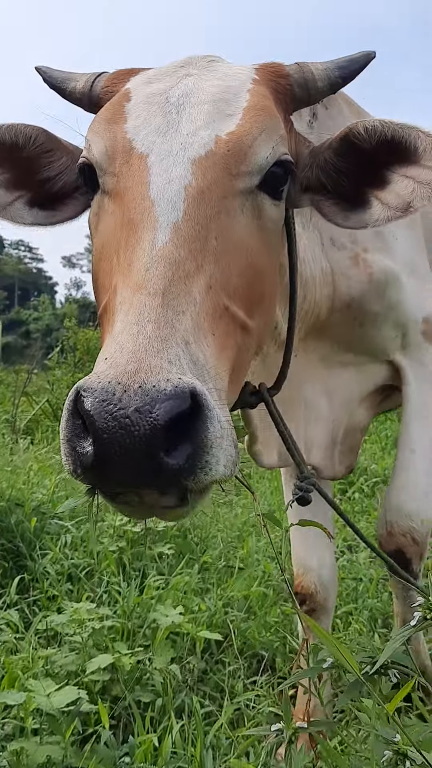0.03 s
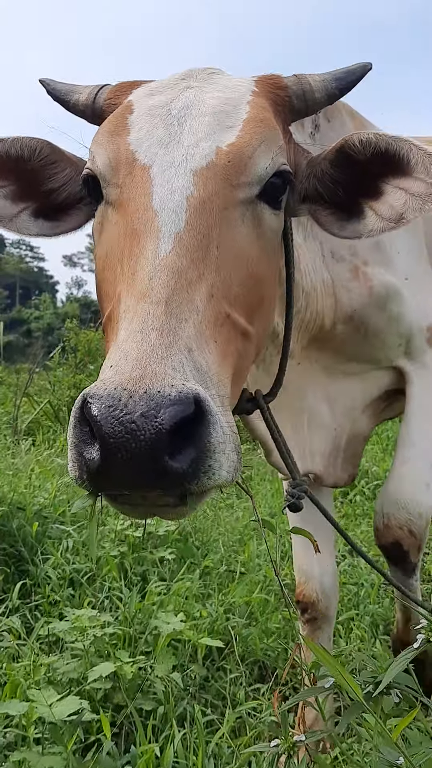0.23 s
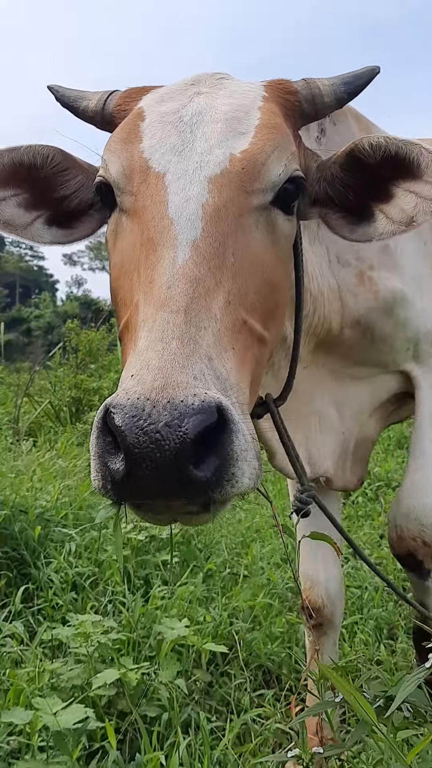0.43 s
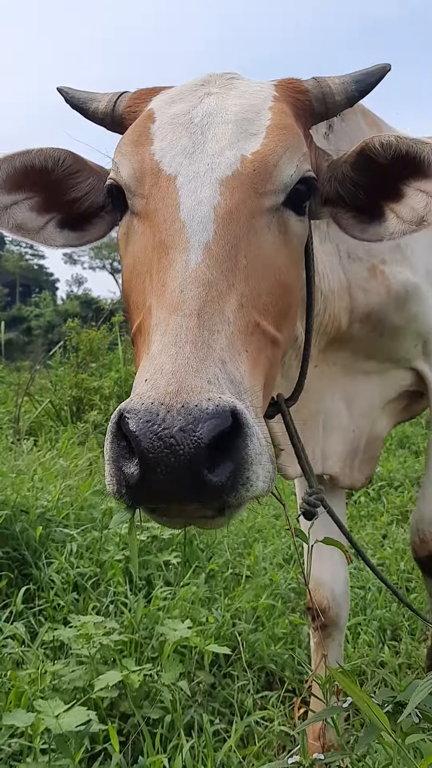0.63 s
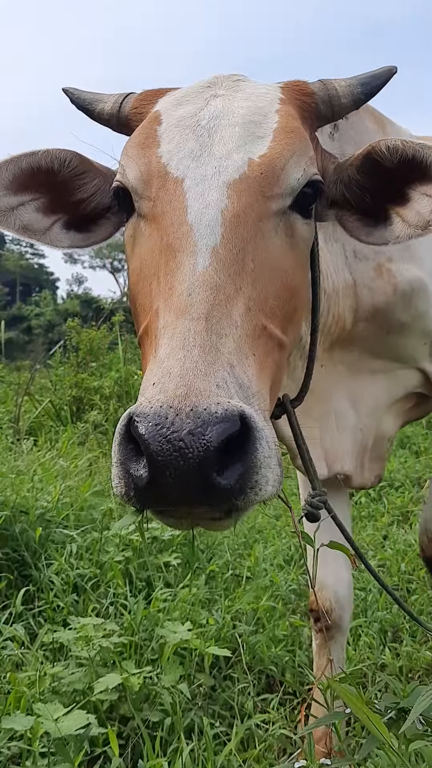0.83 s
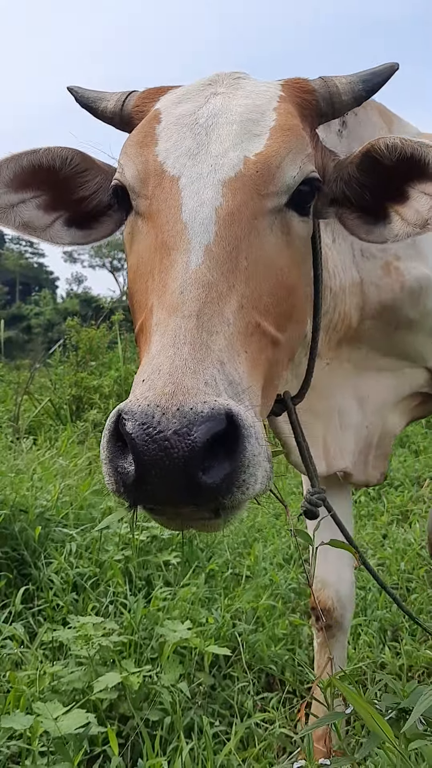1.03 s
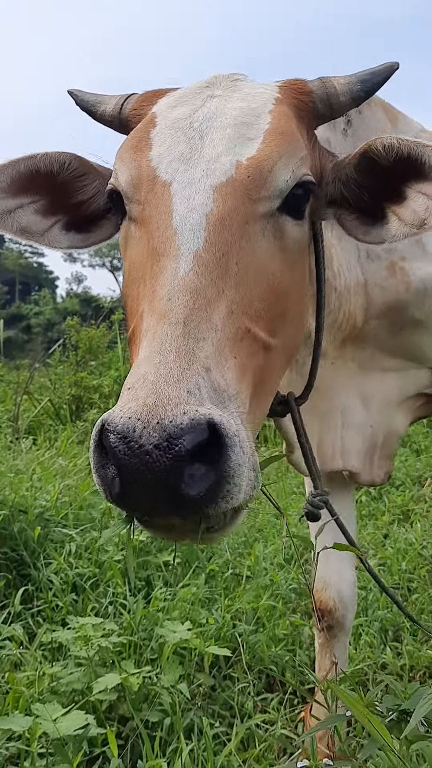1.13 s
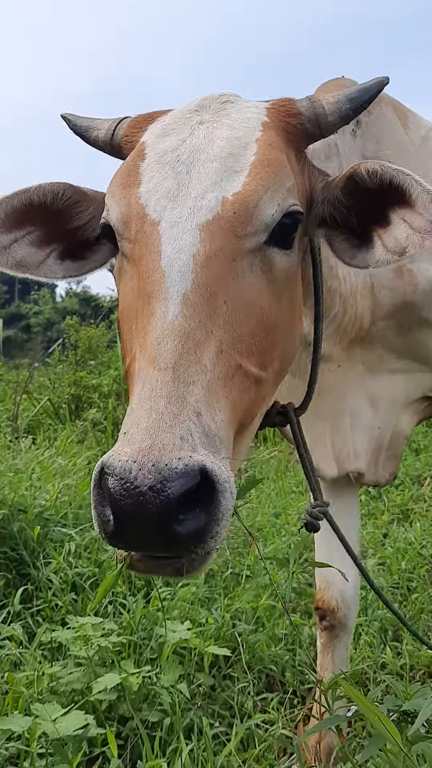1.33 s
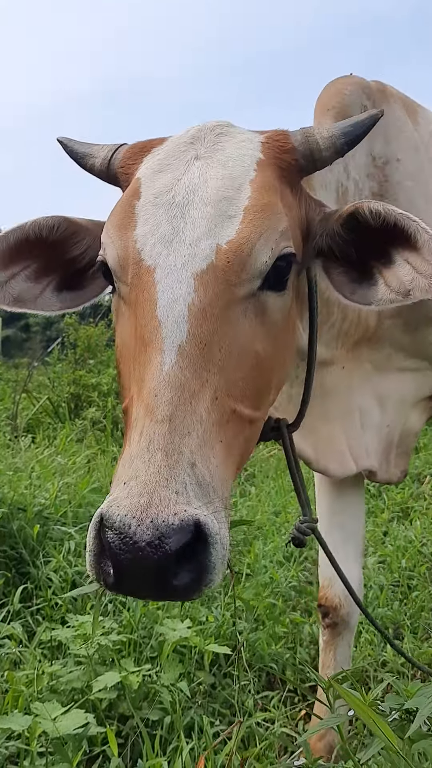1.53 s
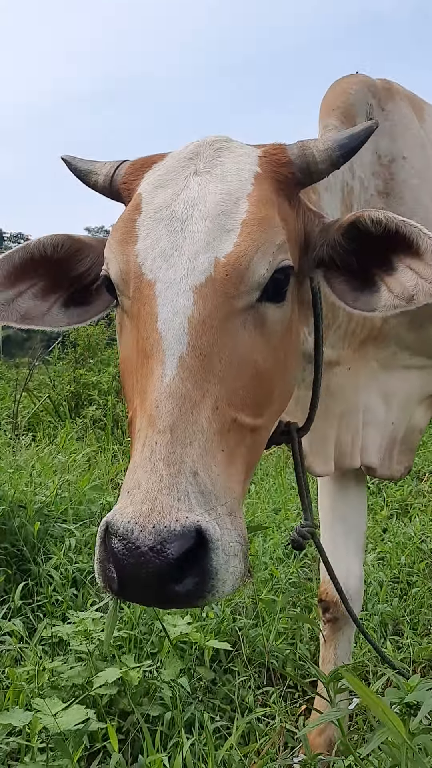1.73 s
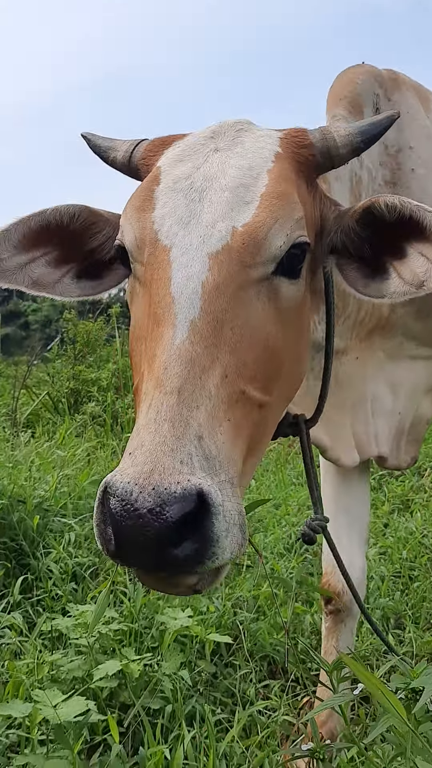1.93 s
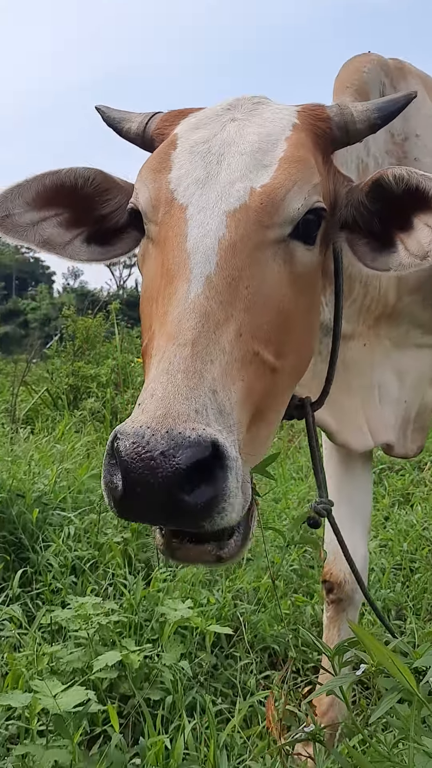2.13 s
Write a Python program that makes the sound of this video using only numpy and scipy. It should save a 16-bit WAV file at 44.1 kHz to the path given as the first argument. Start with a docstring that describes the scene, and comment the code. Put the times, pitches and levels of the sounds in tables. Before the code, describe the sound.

A cow munches grass with heavy muffled thuds, while insects shimmer and a bird whistles faintly

```python
"""A cow chews grass in a meadow: dull thumps, about one strong one per chew, are pressure pulses ringing damped
resonances, with scuffs, a sinking boom and a low rumble around them. Her munching is swelling resonant noise.
Grass is shaped noise, insects a narrow noise band, the bird a frequency-modulated sine; a steady shaped noise,
air with a weak insect band, lies behind. The left microphone is open to the meadow and gets only a trace of
the thumps; the muffled right one takes them in full. The hardest thump makes the limiter duck both channels."""
import sys
import numpy as np
from scipy.fft import rfft, irfft, next_fast_len
from scipy.io import wavfile
from scipy.ndimage import uniform_filter1d, minimum_filter1d, map_coordinates

SR = 44100
rng = np.random.default_rng(int(sys.argv[2]) if len(sys.argv) > 2 else 0)


def put_to_file(sound):
    """Save the sound as 16-bit audio at rate SR, in the file named by the first command-line argument."""
    columns = np.atleast_2d(sound).T  # one column per channel
    safe = np.clip(columns, -1, 1)
    whole_steps = np.round(safe * 32767)
    wavfile.write(sys.argv[1], SR, whole_steps.astype(np.int16))


N = 95652  # samples


def amp(db):
    """Logarithmic level: decibels to amplitude gain."""
    return 10 ** (np.asarray(db) / 20)


def unit(x):
    """Normalisation: scale to rms 1."""
    return x / np.sqrt(np.mean(x ** 2) + 1e-20)


def clock():
    """Sampling: time in seconds at each sample."""
    return np.arange(N) / SR


def curves(rows):
    """Linear interpolation: one value per sample for each column after the time."""
    times, *columns = np.transpose(rows)
    return [np.interp(clock(), times, column) for column in columns]


def wobble(rate):
    """Random modulation: a smooth curve through normal random knots, rate of them per second."""
    return map_coordinates(rng.standard_normal(4096), [clock() * rate], mode="wrap")


def filtered(x, response):
    """Linear filtering: multiply the spectrum by a response of frequency."""
    m = next_fast_len(N + SR // 2)  # padding leaves room for the ringing
    f = np.fft.rfftfreq(m, 1 / SR)
    return irfft(rfft(x, m) * response(f), m)[..., :N]


def resonance(f, hz, width):
    """Damped resonance: the response of one second-order resonator, of gain 1 at its peak."""
    return 1j * f * width / (hz * hz - f * f + 1j * f * width)


def noise(colour):
    """Spectral shaping: white noise given a relative f/Hz, level/dB curve, at rms 1."""
    hz, db = np.transpose(colour)

    def response(f):
        return amp(np.interp(np.log(f + 1), np.log(hz), db))

    return unit(filtered(rng.standard_normal(N), response))


def band(hz, width):
    """Cascaded resonance: noise through two equal resonators, at rms 1."""
    return unit(filtered(rng.standard_normal(N), lambda f: resonance(f, hz, width) ** 2))


def tone(hz):
    """Phase integration: a sine whose phase is the running sum of its frequency."""
    return np.sin(2 * np.pi * np.cumsum(hz) / SR)


# Relative spectral density of the steady background, air noise with a weak insect band near 4.8 kHz:
# f/Hz, level/dB per Hz
BACKGROUND_SPECTRUM = [(25, -11.5), (90, 11), (220, -0.5), (430, 6), (750, -4), (1800, -5), (3200, -22),
                       (4100, -2), (4750, 12), (5600, 0), (6500, -7), (7400, -6), (10000, -5.5),
                       (12500, 1.5), (14000, -22), (16000, -12)]
BACKGROUND_DB = -63.5


def background():
    """Stationary noise: a steady meadow background of air noise with a weak insect band near 4.8 kHz."""
    return amp(BACKGROUND_DB) * noise(BACKGROUND_SPECTRUM)


# Mean level of the insect band: t/s, level/dB
INSECT_LEVEL = [(0, -46.5), (.33, -45.5), (.75, -45.5), (1.15, -50.5), (1.4, -49.5), (1.62, -50),
                (1.9, -46), (2.17, -50.5)]
INSECT_HZ, INSECT_WIDTH_HZ = 8634, 730  # centre, half-power bandwidth


def insects():
    """Superposition: many insects merge into one narrow, shimmering noise band with steep sides."""
    level_db, = curves(INSECT_LEVEL)

    def response(f):
        return (1 + (2 * (f - INSECT_HZ) / INSECT_WIDTH_HZ) ** 4) ** -.5

    shrill = unit(filtered(rng.standard_normal(N), response))
    return amp(level_db + 1.3 * wobble(45.1)) * shrill


# Mean pitch and level of the long whistle, before buzz and dips: t/s, f/Hz, level/dB
WHISTLE_PATH = [(.54, 6550, -100), (.59, 6404, -67), (.63, 6290, -62.5), (.68, 6620, -63), (.72, 5820, -67),
                (.77, 5340, -58.5), (.815, 5300, -58), (.86, 5035, -61.5), (.97, 4904, -55),
                (1.01, 5000, -58), (1.06, 4884, -52.5), (1.125, 5020, -56), (1.176, 4870, -53),
                (1.245, 4910, -51.5), (1.29, 5130, -62.5), (1.4, 4905, -53), (1.435, 4893, -62),
                (1.52, 5040, -61.5), (1.58, 4910, -59.5), (1.62, 4930, -78)]
# Buzz on the whistle: t/s, amplitude depth (0-1), pitch swing/Hz
BUZZ_PATH = [(.78, .05, 5), (.92, 0.66, 11), (1.24, 0.52, 10), (1.3, 1, 280), (1.39, 0.86, 21),
             (1.55, 1, 93)]
BUZZ_HZ = 406  # mean rate
# Centres of the brief dips in the whistle: t/s
DIP_TIMES = [.868, .99, 1.028, 1.118, 1.326, 1.376, 1.56]
DIP_DB, DIP_S = -6.5, .007  # depth, Gaussian half length


def whistle():
    """Amplitude and frequency modulation: one buzz modulates both the level and pitch of a sliding sine."""
    hz, db = curves(WHISTLE_PATH)
    db = db + DIP_DB * sum(np.exp(-((clock() - s) / DIP_S) ** 2) for s in DIP_TIMES)
    depth, swing_hz = curves(BUZZ_PATH)
    buzz = tone(BUZZ_HZ * (1 + .03 * wobble(40)))
    level = amp(db + 1.6 * wobble(120)) * (1 + depth * buzz)
    return level * tone(hz * (1 + 0.00397 * wobble(250)) + swing_hz * buzz)


# Short slurs: start t/s, length/s, start f/Hz, end f/Hz, mean peak level/dB
SLUR_PATHS = [(0.664, 0.093, 6750, 7470, -59), (1.7, 0.047, 5950, 4550, -62.5),
              (1.794, 0.0295, 5290, 4600, -64), (1.82, .07, 5760, 4400, -63.5)]


def slurs():
    """Frequency glide: short sines sweep linearly in pitch under half-sine envelopes."""
    song = np.zeros(N)
    for s, length, start_hz, end_hz, level_db in SLUR_PATHS:
        u = np.clip((clock() - s) / length, 0, 1)  # progress through the slur
        hz = (start_hz + (end_hz - start_hz) * u) * (1 + 0.013 * wobble(600))
        song += amp(level_db + 2.2 * wobble(150)) * np.sin(np.pi * u) * tone(hz)
    return song


def bird():
    """Superposition of modulated sines: a long whistle and short slurs."""
    return np.sqrt(2) * (whistle() + slurs())  # a unit sine is brought to rms 1


# Mean level of the rustle: t/s, level/dB
RUSTLE_LEVEL = [(0, -59), (.06, -52), (.19, -62.5), (.31, -57), (.52, -59), (.66, -69.5), (.92, -80),
                (1.07, -60.5), (1.45, -67), (1.61, -64.5), (1.76, -77.5), (2, -73), (2.1, -65)]
# Relative spectral density of the rustle: f/Hz, level/dB per Hz
RUSTLE_SPECTRUM = [(100, -9), (800, -6.5), (1350, 0.5), (1900, -3), (2700, -3.5), (4000, -7.5),
                   (7000, -6.5), (16000, -26)]
# Level of the high hiss: t/s, level/dB
HISS_LEVEL = [(0, -47.5), (.06, -46), (.2, -53.5), (.43, -63), (.54, -50), (.66, -69.5), (.95, -69),
              (1.95, -70.5), (2.12, -62.5)]
# Relative spectral density of the hiss: f/Hz, level/dB per Hz
HISS_SPECTRUM = [(100, -18), (2500, -9), (6000, -5), (11000, 3.5), (16000, -1.5)]


def grass():
    """Friction noise: blades brush together as level-modulated noise, with a fine hiss on top."""
    rustle_db, = curves(RUSTLE_LEVEL)
    hiss_db, = curves(HISS_LEVEL)
    rustle = amp(rustle_db + wobble(70.27)) * noise(RUSTLE_SPECTRUM)
    hiss = amp(hiss_db) * noise(HISS_SPECTRUM)
    return rustle + hiss


# Mean level of the rumble: t/s, level/dB
RUMBLE_PATH = [(0, -39), (.33, -34.5), (.45, -36.5), (.7, -37.5), (.97, -40.5), (1.25, -37.5),
               (1.62, -41.5), (1.85, -38), (2.17, -38)]
# Relative spectral density of the rumble: f/Hz, level/dB per Hz
RUMBLE_SPECTRUM = [(20, -13.5), (60, 1), (115, 0.5), (180, -14), (400, -28.5), (600, -45.5), (900, -54),
                   (2500, -58.5), (9000, -72), (13300, -56), (16000, -66)]
RUMBLE_SWING_DB = 1  # standard deviation of the knots


def rumble():
    """Random level modulation: low-frequency noise swells restlessly under the thumps."""
    level_db, = curves(RUMBLE_PATH)
    return amp(level_db + RUMBLE_SWING_DB * wobble(23)) * noise(RUMBLE_SPECTRUM)


# Uneven swells: peak t/s, level/dB before the wobble, rise/s, fall/s, mouth resonance f/Hz, resonator width/Hz
MUNCH_SWELLS = [(.06, -62, 0.055, 0.084, 500, 260), (.31, -62.5, 0.11, 0.17, 512, 282),
                (1.01, -59, 0.076, 0.051, 518, 161), (1.16, -50.5, 0.12, 0.11, 436, 212),
                (1.41, -61, 0.12, 0.047, 404, 201), (1.63, -55, 0.083, 0.053, 486, 217),
                (1.549, -61, 0.05, 0.028, 1340, 600), (1.62, -54.5, 0.052, 0.061, 1118, 594)]


def munching():
    """Resonant filtering: swells of soft noise are coloured by the cow's mouth."""
    t, out = clock(), np.zeros(N)
    for s, db, rise, fall, hz, width in MUNCH_SWELLS:
        swell = np.exp(-((t - s) / np.where(t < s, rise, fall)) ** 2)
        out += amp(db) * swell * band(hz, width)
    return out * amp(1.66 * wobble(50.1))


# Damped modes that a push rings: f/Hz, width/Hz, level/dB before the low cut
BODY_MODES = [(103.3, 79.6, 4), (214, 130, -4.5), (428, 480, -0.5), (119.2, 19.7, -0.5)]
BODY_LOW_HZ = 42  # first-order high-pass corner


def body(f):
    """Modal summation: the damped low resonances that every push rings, above a low cut."""
    modes = sum(amp(db) * resonance(f, hz, width) for hz, width, db in BODY_MODES)
    return modes * 1j * f / (BODY_LOW_HZ + 1j * f)


# Runs of tiny pushes: centre t/s, level/dB, Gaussian half length/s
SCUFF_RUNS = [(0.076, -37.5, .02), (0.246, -34, 0.035), (0.327, -42.5, 0.022), (0.532, -44.5, 0.025),
              (0.815, -36, 0.016), (1.081, -44, 0.039), (1.208, -35, 0.018), (1.429, -45, 0.017),
              (1.738, -45, 0.013), (1.835, -38.5, 0.043), (2.023, -41.5, 0.019)]
SCUFF_RATE, SCUFF_SOFT_HZ = 500, 432  # mean pushes per second, scale of the treble roll-off


def scuffs():
    """Random impulse train: tiny, soft, irregular pushes crowd around the thumps and ring the body."""
    level = sum(amp(db) * np.exp(-((clock() - s) / half) ** 2) for s, db, half in SCUFF_RUNS)
    grains = rng.standard_normal(N) * (rng.random(N) < SCUFF_RATE / SR)

    def response(f):
        return body(f) / np.cosh(np.minimum(2 * f / SCUFF_SOFT_HZ, 20))

    return level * unit(filtered(grains, response))


BOOM_S, BOOM_DB, BOOM_LENGTH_S = .774, -6, 0.041  # start, amplitude before the envelope, Gaussian decay
BOOM_HZ, BOOM_EXTRA_HZ, BOOM_SETTLE_S = 53, 78, 0.0066  # final pitch, extra at the start, its decay time


def boom():
    """Decaying oscillation of falling frequency: one heavy bump swings a few times, ever slower."""
    t = np.maximum(clock() - BOOM_S, 0)
    hz = (t > 0) * (BOOM_HZ + BOOM_EXTRA_HZ * np.exp(-t / BOOM_SETTLE_S))
    attack = 1 - np.exp(-t / 0.0013)
    decay = np.exp(-(t / BOOM_LENGTH_S) ** 2)
    return amp(BOOM_DB) * tone(hz) * attack * decay


def bump(u):
    """Smooth contact pulse: a hyperbolic secant of height 1."""
    return 1 / np.cosh(np.clip(u, -40, 40))


# Thumps: push t/s, push level/dB before the body, contact time constant/ms,
# opposite tug relative to the push (0-1), snap level/dB before its envelope
THUMP_EVENTS = [(0.0405, -4, 0.67, 0.48, -52), (0.062, -16.5, 0.54, 0, -54), (0.2085, -5, 0.78, 0.32, -59),
                (.240, -17.5, 1, 0.8, -59), (.262, -18, 1, 0.56, -62), (.7722, -8, .54, 0.03, -45),
                (.808, -15.5, 1, 0, -55.5), (1.0493, -13.5, 0.96, 0.3, -64), (1.170, -24.5, 0.74, 0.2, -66),
                (1.194, -17, 0.51, 0.15, -60), (1.405, -6, .45, 0.19, -47), (1.8142, -23.5, 0.77, 0.4, -61),
                (1.896, -25, 0.8, 0.27, -67.5), (1.9642, 11, 0.57, 0.95, -26),
                (1.9739, -2.5, 0.59, 0.27, -52.5)]
TUG_LEAD_S = 0.0014
SNAP_HZ, SNAP_S = 1710, 0.00023  # pitch, envelope time constant


def thumps():
    """Impulsive excitation: a tug and an opposite soft push ring the body, with a brief snap beside them."""
    pushes, snaps = np.zeros(N), np.zeros(N)
    for s, db, contact_ms, tug, snap_db in THUMP_EVENTS:
        t = clock() - s
        contact = contact_ms / 1000
        pushes += amp(db) * (tug * bump((t + TUG_LEAD_S) / contact) - bump(t / contact))
        snaps -= amp(snap_db) * bump(t / SNAP_S) * np.sin(2 * np.pi * SNAP_HZ * t)
    return filtered(pushes, body) + snaps


LEAK_DB, MUFFLE_HZ = -11.5, 1160  # meadow in the muffled microphone: gain, half-amplitude frequency
THUMP_LEAK_DB = -63  # low sounds in the open microphone


def scene():
    """Superposition at two microphones: left open to the meadow, right muffled and taking the thumps."""
    meadow = background() + insects() + bird() + grass() + munching()
    low = rumble() + scuffs() + boom() + thumps()
    muffled = amp(LEAK_DB) * filtered(meadow, lambda f: 1 / (1 + (f / MUFFLE_HZ) ** 3))
    return np.array([meadow + amp(THUMP_LEAK_DB) * low, low + muffled])


CEILING, LOOKAHEAD_S, RELEASE_S = 1, 0.0059, 0.042  # full scale = 1
TOP_HZ = 15900  # band limit


def record(dry):
    """Peak limiting and band limiting: one look-ahead gain ducks both channels and recovers."""
    over = np.log(np.maximum(np.abs(dry).max(0) / CEILING, 1))
    fade = np.exp(-clock() / RELEASE_S)
    held = np.maximum.accumulate(over / fade) * fade  # log reduction decays after each peak
    reach = 2 * int(LOOKAHEAD_S * SR / 2) + 1  # odd window, centred on each sample
    gain = uniform_filter1d(minimum_filter1d(np.exp(-held), reach), reach)
    return filtered(dry * gain, lambda f: f < TOP_HZ)


dry = scene()
out = record(dry)
put_to_file(out)
```